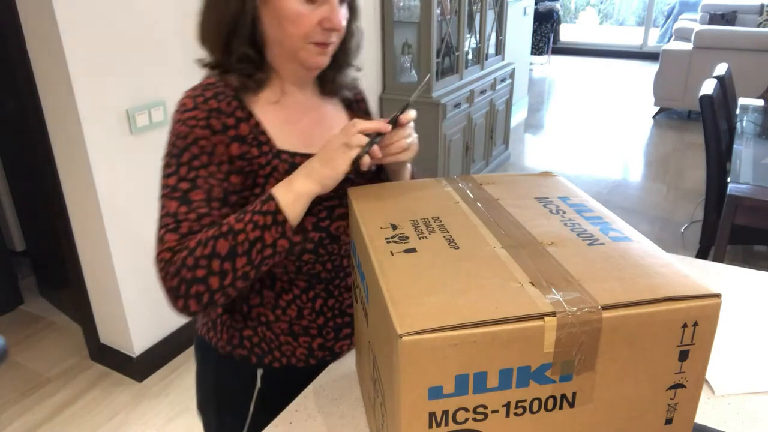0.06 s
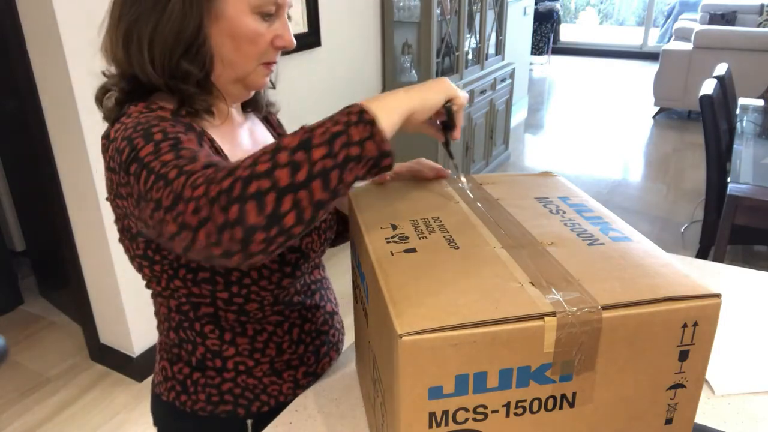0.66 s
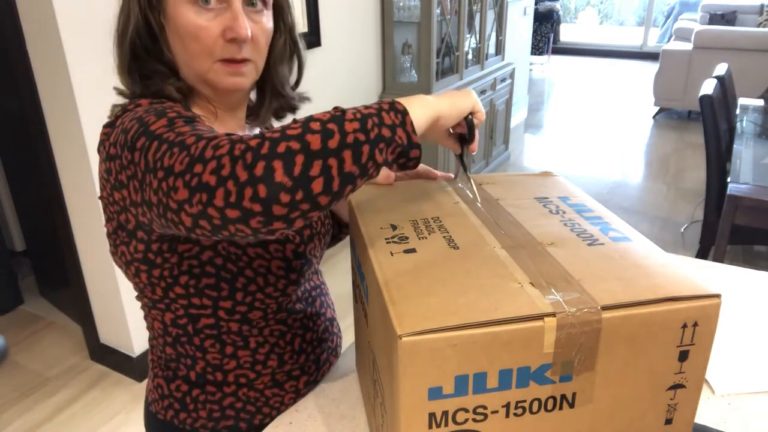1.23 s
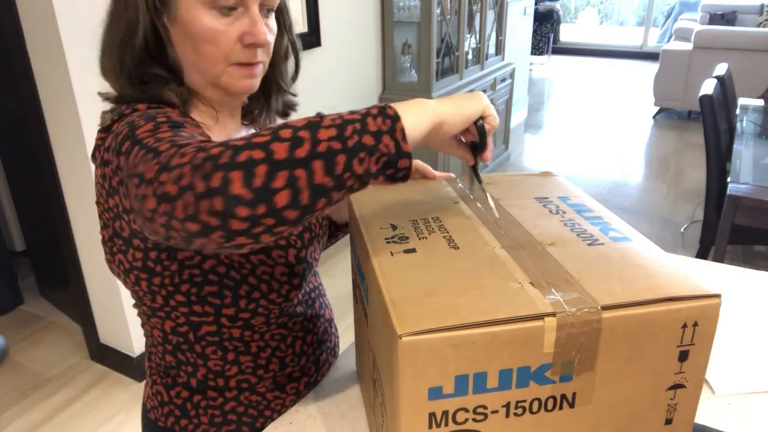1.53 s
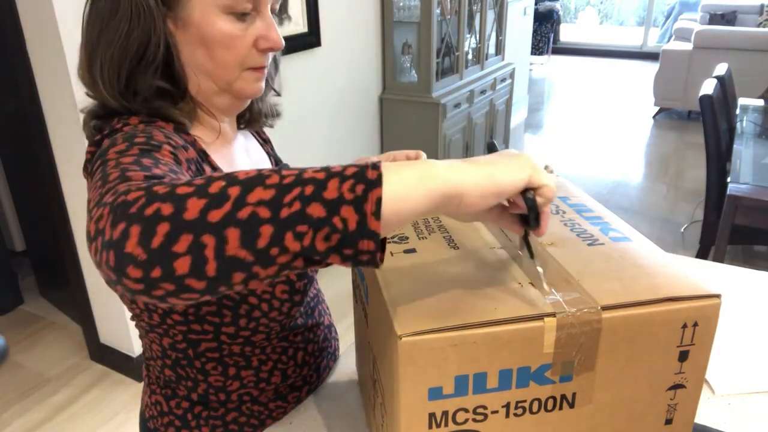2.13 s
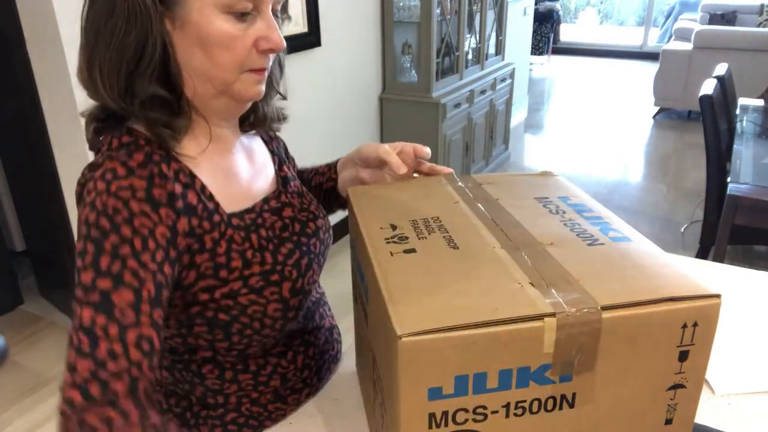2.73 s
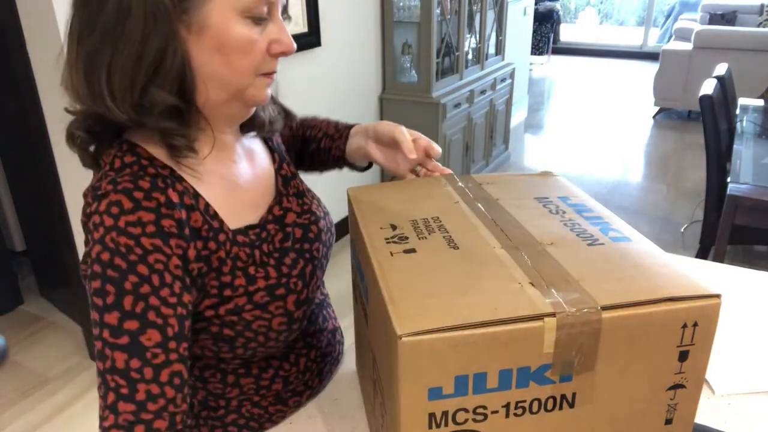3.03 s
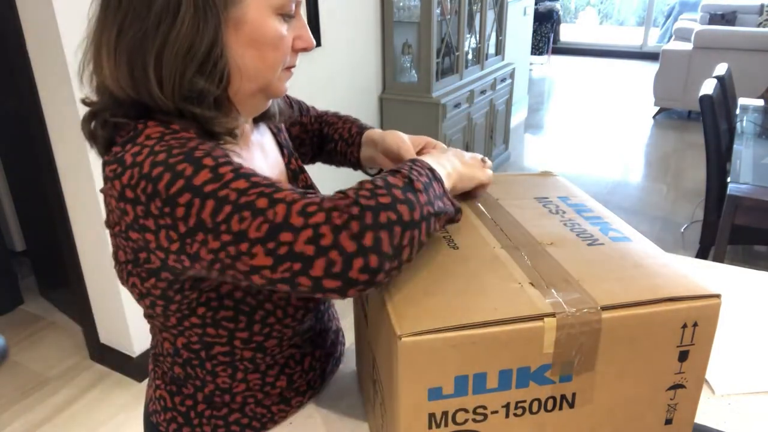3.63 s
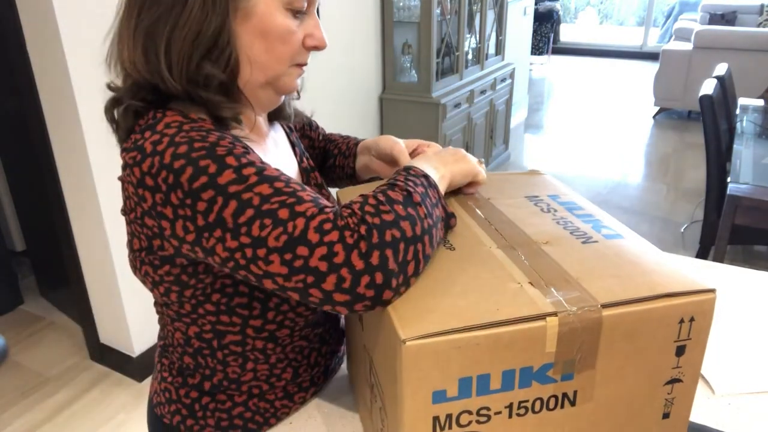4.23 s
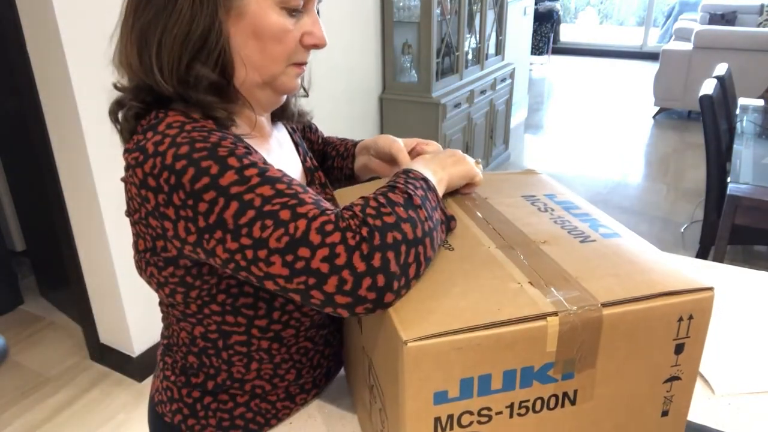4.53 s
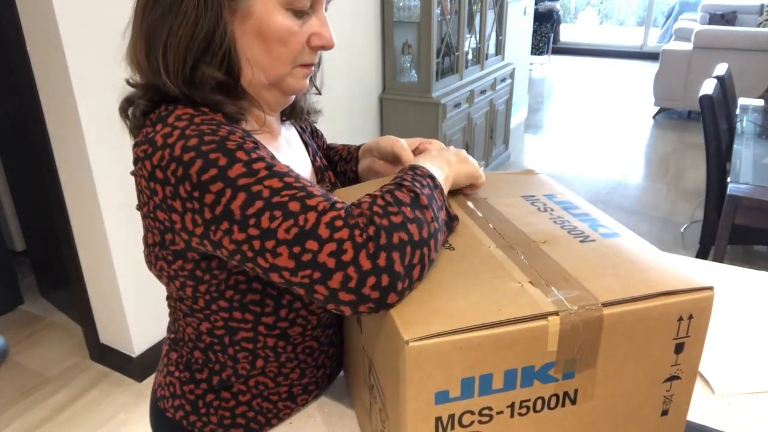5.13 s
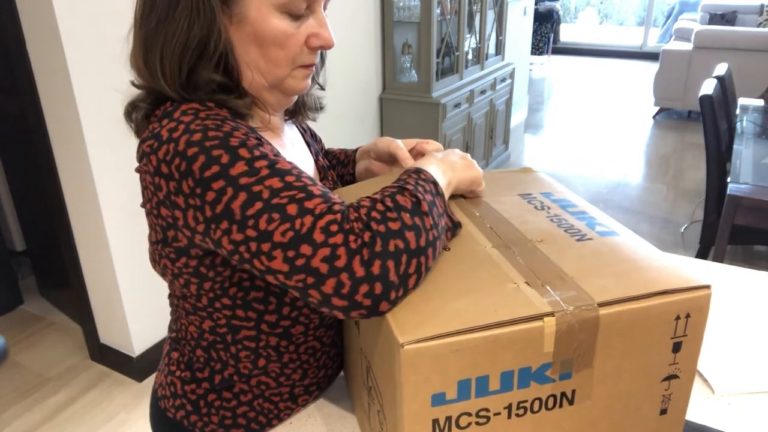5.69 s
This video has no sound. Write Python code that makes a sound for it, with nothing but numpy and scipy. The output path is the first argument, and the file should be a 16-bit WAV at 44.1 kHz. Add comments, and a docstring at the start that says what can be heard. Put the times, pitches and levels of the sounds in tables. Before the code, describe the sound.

A blade scrapes and pops along a taped cardboard box, scissors land with a clatter, and nails pick at the tape indoors.

```python
"""A tiled living room. Scissors click open and one blade is dragged along the packing tape of a big
cardboard box: countless tiny slips rasp, fizz and drum on the lid, and the blade snags and breaks through.
The scissors clatter down on the table, then fingernails pick at the tape until it snaps loose twice.
Each contact rings the modes of cardboard or steel, and the room rings after every sound, over a low hush."""
import sys
import numpy as np
from scipy import signal
from scipy.fft import rfft, irfft, next_fast_len
from scipy.io import wavfile
from scipy.ndimage import map_coordinates

SR = 44100
rng = np.random.default_rng(int(sys.argv[2]) if len(sys.argv) > 2 else 0)


def to_wav(s):
    """Save 16-bit WAV."""
    ch = np.atleast_2d(s).T  # columns
    pcm = np.round(np.clip(ch, -1, 1) * 32767)  # PCM
    wavfile.write(sys.argv[1], SR, pcm.astype(np.int16))


N = 253883

# modes of the cardboard lid: f/Hz, width/Hz, level/dB
LID_MODES = [(102.6, 9, -2.5), (220, 45, 4.5), (265.4, 14, 1), (293.8, 18, 3.5), (454, 120, -14.5),
             (769, 14, -15.5), (1098, 58, -3.5), (1332, 170, -13.5), (1680, 310, -9), (2690, 130, -3),
             (3420, 750, -14.5), (5770, 1400, -8)]


def amp(db):
    """Decibels as a gain."""
    return 10 ** (np.asarray(db) / 20)


def unit(x):
    """x at rms 1."""
    return x / np.sqrt(np.mean(x ** 2) + 1e-20)


def along(points, hz):
    """A curve through (f/Hz, value) points on a log frequency axis."""
    f, v = np.transpose(points)
    return np.interp(np.log(hz + 1), np.log(f + 1), v)


def filtered(x, response):
    """x through a complex frequency response."""
    size = next_fast_len(N + SR // 2)
    return irfft(rfft(x, size) * response(np.fft.rfftfreq(size, 1 / SR)), size)[:N]


def coloured(x, eq):
    """x through an EQ curve (f/Hz, gain/dB), at rms 1."""
    return unit(filtered(x, lambda hz: amp(along(eq, hz))))


def body(modes, hz):
    """A flat response with resonances standing out of it."""
    return 1 + sum(amp(db) * 1j * hz * width / (f * f - hz * hz + 1j * hz * width)
                   for f, width, db in modes)


def bending(hz, lag_s):
    """Bending waves carry treble faster than bass; lag_s is the travel time at 1 kHz."""
    return np.exp(-4j * np.pi * lag_s * np.sqrt(1000 * hz))


def hush():
    """The steady, bass-heavy room tone of the house."""
    eq = [(15, -36), (25, -29), (45, -7), (76, -1), (170, -7), (256, -6), (516, -8.5), (624, -8.5),
          (695, -11), (887, -9), (1480, -21.5), (6560, -22), (7310, -23.5), (8140, -21), (8830, -31),
          (16000, -29.5)]  # room tone colour: f/Hz, gain/dB
    return amp(-64) * coloured(rng.standard_normal(N), eq)


def room_tail(build_s=0.00017):
    """A fresh diffuse reverb tail of the tiled room, each frequency dying at its own speed."""
    decay = [(100, 0.4), (250, 0.61), (1000, 0.8), (2500, 0.87), (5000, 0.72), (8000, 0.62), (11000, 0.54),
             (15000, 0.3)]  # reverb time: f/Hz, t60/s
    walls = [(80, 3), (250, -2.5), (600, 2), (1500, -0.1), (5000, -2.3), (9000, -4), (15000, -5)]  # reverb colour: f/Hz, gain/dB
    hz, t, noise = signal.stft(rng.standard_normal(SR), SR, nperseg=256)
    t60 = along(decay, hz)[:, None]
    fade = 1000 ** (-t / t60) * np.sqrt(2 * np.log(1000) / (t60 * SR))  # equal energy for any t60
    tail = signal.istft(noise * fade * amp(along(walls, hz))[:, None], SR, nperseg=256)[1][:SR]
    return tail * (1 - np.exp(-np.arange(SR) / SR / build_s))


def slips(per_s, spread_db, clump_db, clump_hz):
    """Tiny stick-slip jerks of uneven size that come in clumps."""
    sizes = rng.standard_normal(N) * amp(spread_db * np.clip(rng.standard_normal(N), -2, 2))
    jerks = rng.random(N) < per_s / SR
    knots = rng.standard_normal(int(N * clump_hz / SR) + 4)
    wobble = map_coordinates(knots, [np.arange(N) * clump_hz / SR])
    return unit(jerks * sizes * amp(clump_db * np.tanh(wobble)))


def fingers():
    """Skin and nails crackle faintly over handles and tape, with sparse ticks of creases."""
    rubs = [(0.0, 0.703, -79), (3.588, 4.04, -64.5), (4.025, 4.66, -67.5), (4.677, 5.737, -63.5)]  # finger slides: start/s, end/s, level/dB
    rustle_eq = [(300, 2), (1000, -0.5), (2500, -1), (5500, -2), (9000, -16), (15000, -15)]  # skin on plastic: f/Hz, gain/dB
    crease_eq = [(1000, -22), (3500, 8), (7000, -4), (13000, -2), (16000, -7)]  # a crease ticking: f/Hz, gain/dB
    t, fade_s = np.arange(N) / SR, 0.1
    rubbing = sum(amp(db) * np.clip(.5 + np.minimum(t - start, end - t) / fade_s, 0, 1)
                  for start, end, db in rubs)
    rustle = rubbing * coloured(slips(per_s=3000, spread_db=3, clump_db=3.5, clump_hz=40), rustle_eq)
    creases = rubbing * coloured(slips(per_s=27, spread_db=1, clump_db=4, clump_hz=6), crease_eq)
    return rustle + amp(-7.5) * creases + amp(1) * signal.fftconvolve(rustle, room_tail())[:N]


def blow(voice, s, chatter_s, level_db, thud_db, knock_db, tick_db, pitch=1, thud_hz=None, room_db=0):
    """One contact's settings: a voice's four bands (thud, knock, snap, tick), trimmed and pitched."""
    hz, db = np.transpose(voice)
    thud, knock, snap = hz[:3] * pitch
    levels = db + level_db + np.array([thud_db, knock_db, 0, tick_db])
    return s, chatter_s, (thud_hz or thud, knock, snap, hz[-1]), levels, room_db


def contacts(blows, modes, lag_s, crack_s, size=8192):
    """Each contact is a crack and a brief chatter that travel through a panel and ring its modes."""
    widths = [0.7, 0.77, 0.56, 0.75]  # thud, knock, snap and tick bands: width/octaves
    out, t, hz = np.zeros(N + 2 * SR), np.arange(size) / SR, np.fft.rfftfreq(size, 1 / SR)
    lead = size // 32  # space for the bands to ring ahead of the hit
    path = body(modes, hz) * bending(hz, lag_s) * np.exp(-2j * np.pi * hz * lead / SR)
    for s, chatter_s, centres, levels, room_db in blows:
        chatter = rng.standard_normal(size) * 1000 ** (-t / chatter_s)
        chatter /= np.linalg.norm(chatter)
        chatter[0] += (crack_s / chatter_s) ** 2  # the briefest tears are one clean crack
        comb = rfft(chatter)
        comb /= np.sqrt(np.abs(comb))  # slips differ in place, so their comb is shallow
        slipping = rfft(irfft(comb) * (t < t[-1] / 2))
        forces = [1, slipping, slipping, slipping]  # the thud is one push; higher bands follow each slip
        hit = np.zeros(size)
        for force, centre, octaves, db in zip(forces, centres, widths, levels):
            band = np.exp(-.5 * (np.log2((hz + 1) / centre) / octaves) ** 2)
            part = irfft(force * path * band)
            hit += amp(db) * part / np.linalg.norm(part) * np.sqrt(SR / 160)  # level as rms over 1/160 s
        sound = amp(room_db) * signal.fftconvolve(hit, room_tail())
        sound[:size] += hit
        out[round(s * SR) - lead:][:len(sound)] += sound
    return out[:N]


def scissors():
    """The steel clicks open in the hand and later clatters onto the table."""
    # modes of the scissors, the lowest that of the table they land on: f/Hz, width/Hz, level/dB
    steel_modes = [(105, 22, 22), (1233, 140, -4), (1950, 450, 5), (3750, 450, 7), (4748, 350, 0),
                   (5880, 250, 8), (7250, 500, 2), (9254, 300, -2), (13200, 500, 0)]
    # voices of a click and a landing, a row each for thud, knock, snap and tick: f/Hz, level/dB
    click_voice = [(230, -17), (2100, -5), (5400, -1), (12100, 5.5)]
    landing_voice = [(420, -11), (1200, -6.5), (5200, 1), (12100, -6.5)]
    # blades opening: t/s, level/dB, thud trim/dB, knock trim/dB, tick trim/dB
    clicks = [(0.15, -64, 19, 16.5, 7), (0.2447, -64, 0, -1, 10.5), (0.428, -71.5, -1, -2, 10.5),
              (0.4974, -47, -10, -6.5, -18), (0.5974, -65.5, -5, 3, 8.5)]
    # bounces on the table: t/s, chatter/s, level/dB, thud trim/dB, knock trim/dB, tick trim/dB, pitch/x
    landings = [(2.8265, 0.021, -30.5, 0.5, 1, -1.5, 1.02), (2.8678, 0.012, -42.5, -2, -6, 13.5, 0.86),
                (2.91, 0.0052, -44, 12.5, 4.5, 11.5, 0.81), (2.9206, 0.022, -35, -13, -12, -3, 1.4),
                (2.9756, 0.033, -42.5, 8, 10, 8, 1.04), (3.0064, 0.04, -37, 3, -7, 4, 0.82),
                (3.0246, 0.028, -21.5, -4.5, -2, 2.5, 0.92), (3.0316, 0.029, -34.5, 1, 8, 1, 1.26)]
    chatter_s = 0.025
    blows = [blow(click_voice, s, chatter_s, *levels, room_db=-2) for s, *levels in clicks]
    blows += [blow(landing_voice, *row, room_db=-0.5) for row in landings]
    return contacts(blows, steel_modes, lag_s=0.00201, crack_s=0.0065)


def box():
    """Taps, snags of the blade and picks of the nails all ring the same cardboard lid."""
    # voices of the three contacts, a row each for thud, knock, snap and tick: f/Hz, level/dB
    tap_voice = [(300, 2), (1000, -2), (3400, 0.5), (10200, -11)]
    snag_voice = [(300, 10), (1100, 0.5), (4100, -1), (10200, -6)]
    pick_voice = [(340, -0.5), (1300, 0), (3850, 0), (10200, -14.5)]
    # blade tip and hands coming down: t/s, level/dB, thud trim/dB, knock trim/dB, tick trim/dB
    taps = [(0.7238, -62.5, 5.5, -1, 2), (0.8925, -46.5, -3.5, -5, 5), (1.0189, -51.5, 6.5, -4, 5),
            (3.5525, -46, 7, 1, -15), (3.5671, -54, 8, 5, 3), (3.6669, -56, -14, 5, -10)]
    # blade catching and breaking through: t/s, tear/s, level/dB, thud trim/dB, knock trim/dB, tick trim/dB
    snags = [(1.3613, 0.065, -38, -11.5, -0.5, -13), (1.3965, 0.033, -38.5, -4, 8, -4),
             (1.4052, 0.033, -40, 1.5, -10, -2.5), (1.549, 0.028, -27.5, 1.5, 0.5, -0.5),
             (1.6735, 0.024, -37, -24, -6, 0), (1.7555, 0.02, -34.5, 2, -3, 5),
             (1.7868, 0.044, -38, 0, 0, 1), (1.9008, 0.018, -24.5, -2, -0.5, -3.5),
             (2.0954, 0.042, -38, 2.5, 1.5, -1), (2.228, 0.019, -47, -12, 7, 16),
             (2.2535, 0.041, -34, 2, -4, 3.5), (2.2933, 0.02, -37, -12, -2.5, 1.5),
             (2.4513, 0.02, -50.5, -13, -8, -5)]
    # a snag's thud sinks as the slit grows: t/s, f/Hz
    thud_pitch = [(1.4, 460), (1.55, 310), (1.9, 226), (2.26, 200)]
    # nails tearing tape loose: t/s, tear/s, level/dB, thud trim/dB, knock trim/dB, tick trim/dB, pitch/x
    picks = [(3.8303, 0.002, -57.5, -10, -7, 3, 1.5), (3.9456, 0.016, -43.5, -12, -34, -15, 1.19),
             (4.2195, 0.1, -52, -7, 6.5, -3, 1.34), (4.2323, 0.024, -37, -13.5, -9, -5.5, 0.84),
             (4.4198, 0.017, -57.5, -0.5, -5, 7, 0.89), (4.7345, 0.0098, -24.5, -17.5, -4, -24, 1.26),
             (4.8712, 0.02, -22, 1.5, 5, 9, 0.91), (4.9005, 0.019, -26, 2.5, -4.5, -22, 0.95),
             (5.126, 0.06, -48, 9.5, 0, 2, 1.05), (5.4389, 0.017, -48.5, 3, 4, -9, 1.2),
             (5.5878, 0.017, -45, -10, 1, 6, 1.15), (5.6007, 0.036, -53.5, -1, 4.5, 22.5, 0.93)]
    scuff_s = 0.031
    blows = [blow(tap_voice, s, scuff_s, *levels, room_db=-2) for s, *levels in taps]
    blows += [blow(snag_voice, s, *row, thud_hz=np.interp(s, *np.transpose(thud_pitch)), room_db=-4)
              for s, *row in snags]
    blows += [blow(pick_voice, *row, room_db=-2.5) for row in picks]
    return contacts(blows, LID_MODES, lag_s=0.003, crack_s=0.019)


def stroke():
    """Gains of drumming, rasp and fizz follow the push; the box's stiff rims hold drum and fizz back."""
    # the blade creeps, bites, stalls after the big snag, bites again and runs out: t/s, effort/dB
    push = [(1.04, -32), (1.08, -10.5), (1.23, -13), (1.33, 2.5), (1.38, -1.5), (1.57, -1), (1.66, 6.5),
            (1.74, -2.5), (1.87, -6), (1.95, -8), (2.05, -17), (2.11, 2.5), (2.22, 1.5), (2.31, -5.5),
            (2.337, 9.5), (2.357, -36)]
    far_rim_s = [2.315, 2.35]  # the drumming dies at the far rim: start/s, end/s
    t = np.arange(N) / SR
    effort_db = np.interp(t, *np.transpose(push), left=-120, right=-120)
    near_rim = np.interp(t, [1.32, 1.39], [1, 0])  # the blade leaves the rim and sinks in
    far_rim = np.interp(t, far_rim_s, [0, 1])
    drum_db = -41 + 0.7 * effort_db - 14 * (near_rim + far_rim)
    rasp_db = -45.5 + effort_db
    fizz_db = -48 + 0.91 * effort_db - 10.5 * near_rim
    return amp(drum_db), amp(rasp_db), amp(fizz_db)


def cutting():
    """The blade splits the tape in countless small slips, which also shake the lid like a drum."""
    drum_eq = [(35, -32), (60, -5.5), (110, -7), (170, -10.5), (230, 0.5), (300, -2), (380, -6.5),
               (470, -4), (650, -11), (1000, -12), (2200, -74)]  # drumming lid, before its pitch shift: f/Hz, gain/dB
    rasp_eq = [(350, -13), (600, -2), (900, -11.5), (1150, -11.5), (1600, -0.5), (2150, -1.5), (2700, 2),
               (3300, 2), (4500, -0.5), (6000, -13), (7500, -25), (9000, -22), (12000, -48)]  # midrange of tearing tape: f/Hz, gain/dB
    fizz_eq = [(3500, -18), (5800, 7), (7400, 4), (8700, -3.5), (11000, -3), (14000, -7.5), (16000, -10)]  # top end of tearing tape: f/Hz, gain/dB
    drum_gain, rasp_gain, fizz_gain = stroke()
    tearing = slips(per_s=6000, spread_db=3, clump_db=5.5, clump_hz=100)
    crackle = slips(per_s=3000, spread_db=4, clump_db=4, clump_hz=90)
    lid = filtered(tearing, lambda hz: body(LID_MODES, hz) * bending(hz, lag_s=.003))
    # the lid goes slack and drums lower as the slit grows
    taut, slack = [coloured(lid, np.multiply(drum_eq, [pitch, 1])) for pitch in (1.2, .88)]
    slit = np.interp(np.arange(N) / SR, [1.72, 2.1], [0, np.pi / 2])
    drumming = np.cos(slit) ** 2 * taut + np.sin(slit) ** 2 * slack
    cut = drum_gain * drumming + rasp_gain * coloured(lid, rasp_eq) + fizz_gain * coloured(crackle, fizz_eq)
    return cut + signal.fftconvolve(cut, room_tail())[:N]


def scene():
    """The box, the scissors and the hands over the hush of the house, in mono."""
    return (hush() + box() + scissors() + cutting() + fingers())[None]


def record(dry):
    """A steep low-pass takes off the very top."""
    top_hz = 15950
    return filtered(dry[0], lambda hz: 1 / np.sqrt(1 + (hz / top_hz) ** 160))[None]


dry = scene()
out = record(dry)
to_wav(out)
```